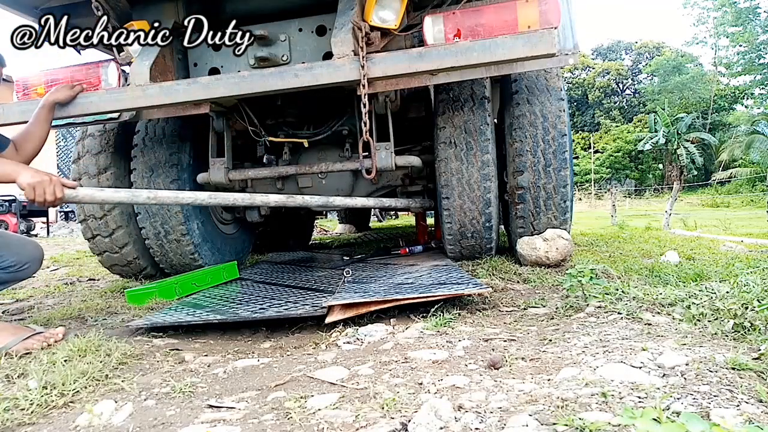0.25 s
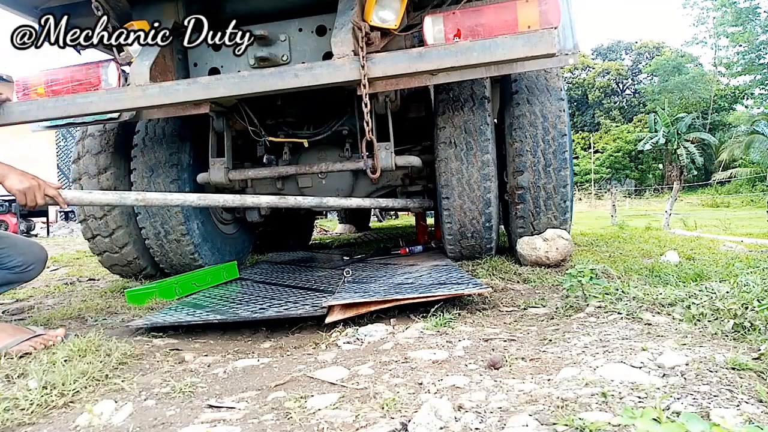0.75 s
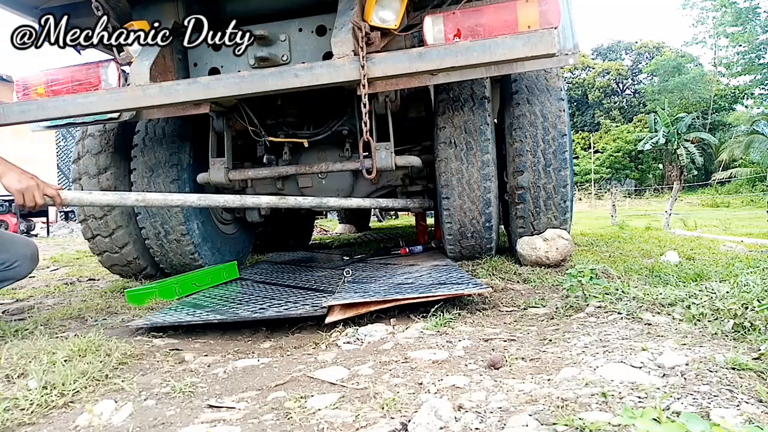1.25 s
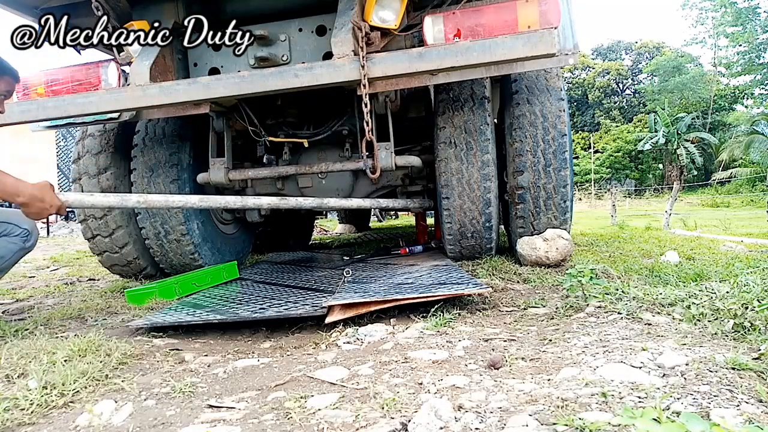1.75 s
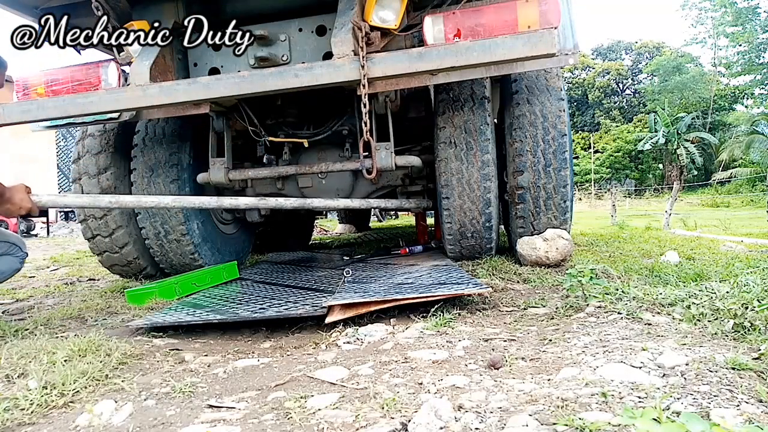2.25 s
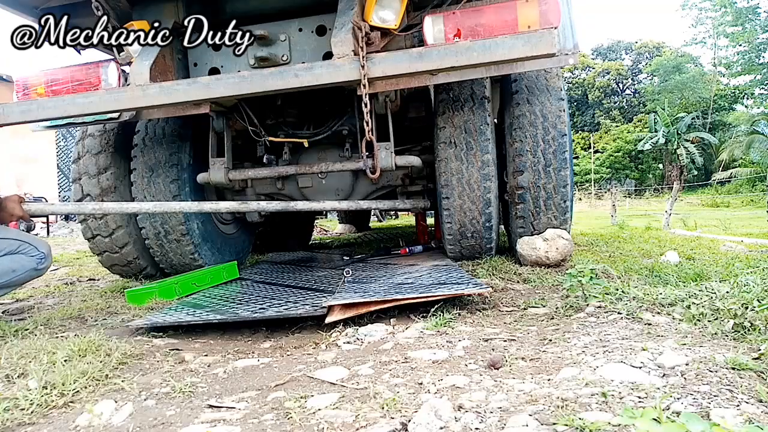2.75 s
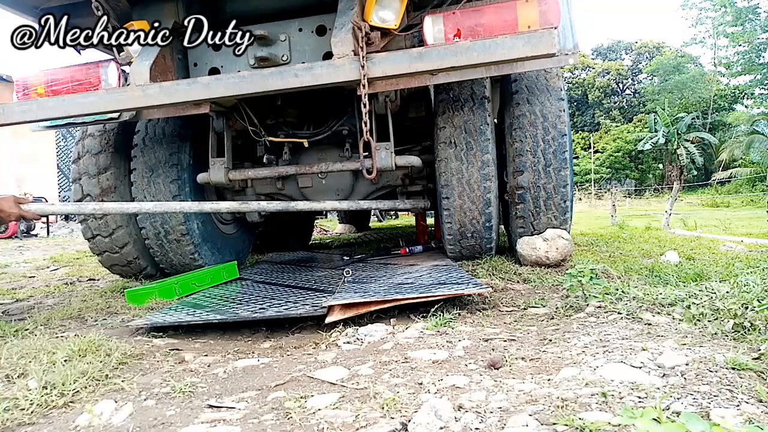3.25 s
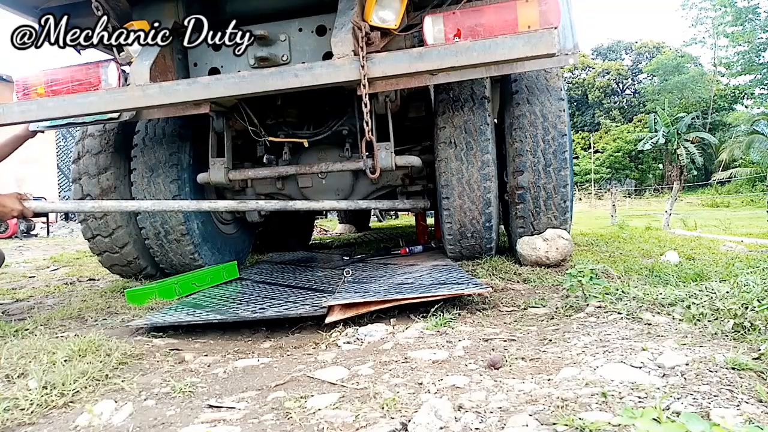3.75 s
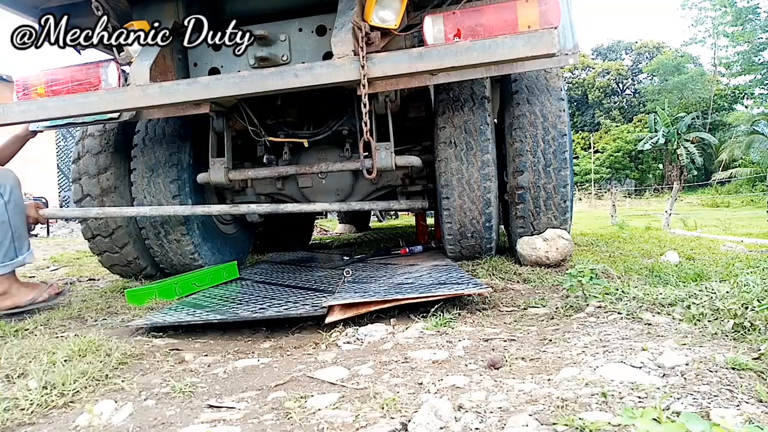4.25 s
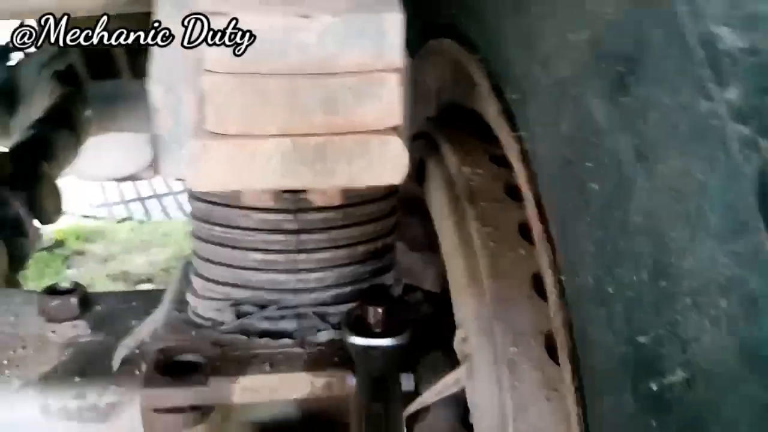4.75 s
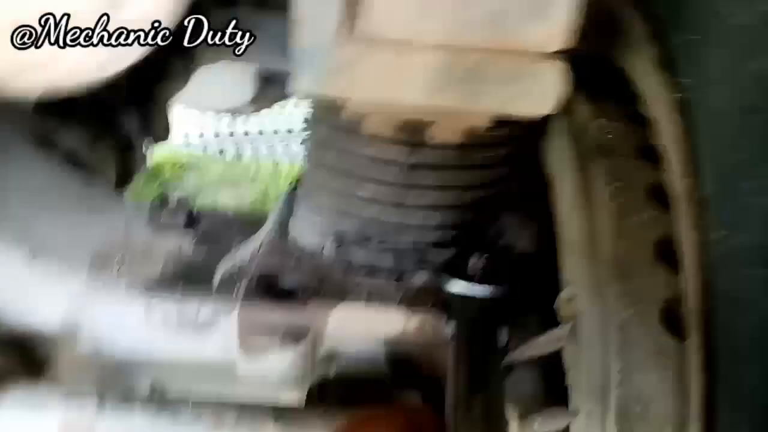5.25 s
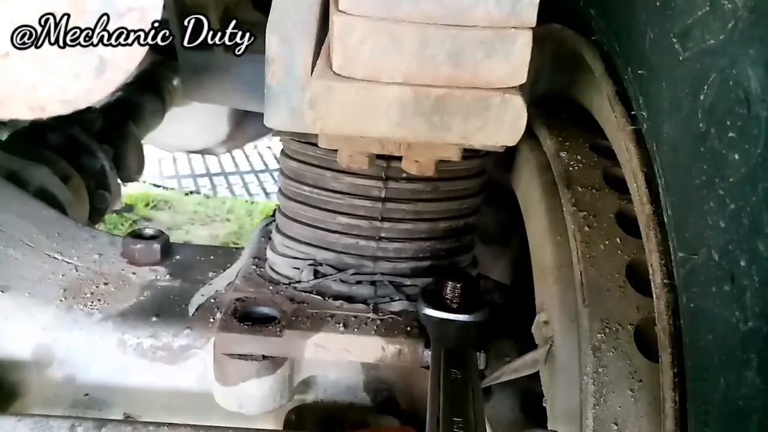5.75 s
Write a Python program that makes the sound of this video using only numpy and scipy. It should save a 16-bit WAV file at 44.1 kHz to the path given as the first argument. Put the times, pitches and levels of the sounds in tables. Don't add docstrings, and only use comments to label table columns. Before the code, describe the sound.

Outdoors in a grassy spot, a continuous high insect trill dominates, with a far engine droning low and running slightly faster from about three seconds. A steel bar clinks lightly a few times. Near 4.7 seconds the phone moves under the truck: insects drop in level, wind thumps buffet each side separately, a sleeve rubs the tyre, and knocks and high clinks follow. Phone stereo, left side duller.

```python
import sys
import numpy as np
from scipy import signal
from scipy.fft import rfft, irfft, next_fast_len
from scipy.io import wavfile
from scipy.ndimage import uniform_filter1d, map_coordinates

SR = 44100
rng = np.random.default_rng(int(sys.argv[2]) if len(sys.argv) > 2 else 0)


def field_ratio(decibels):
    return 10 ** (np.asarray(decibels, dtype=float) / 20)


def wav_record(signal):
    frames = np.transpose(np.atleast_2d(signal))
    bounded = np.clip(frames, -1, 1)
    quanta = np.round(bounded * 32767).astype(np.int16)
    wavfile.write(sys.argv[1], SR, quanta)


N = 264139
TIME = np.arange(N) / SR
CHANGE_S = 4.72


def unit(x):
    return x / np.sqrt(np.mean(x ** 2, axis=-1, keepdims=True) + 1e-20)


def along(points, hz):
    f, v = np.transpose(points)
    return np.interp(np.log(hz + 1), np.log(f + 1), v)


def curves(rows):
    s, *columns = np.transpose(rows)
    return [np.interp(TIME, s, column) for column in columns]


def wobble(rate):
    knots = rng.standard_normal(int(N * rate / SR) + 4)
    return map_coordinates(knots, [TIME * rate])


def bumps(rows):
    return np.sqrt(sum(field_ratio(2 * db) * np.exp(-((TIME - s) / width) ** 2) for s, db, width in rows))


def filtered(x, response):
    m = next_fast_len(N + SR // 4)
    return irfft(rfft(x, m) * response(np.fft.rfftfreq(m, 1 / SR)), m)[..., :N]


def resonance(f, hz, width_hz):
    return 1j * f * width_hz / (hz * hz - f * f + 1j * f * width_hz)


def patchy(x, depth_db):
    z = signal.stft(x, nperseg=512)[2]
    field = uniform_filter1d(rng.standard_normal(z.shape), 4, 1)
    field = uniform_filter1d(field, 12, 2)
    return signal.istft(z * field_ratio(depth_db * field / field.std()), nperseg=512)[1][:, :N]


def ports(common, own, share, lead_s, left_db):
    late = filtered(common, lambda f: np.exp(-2j * np.pi * f * lead_s))
    share = np.clip(share, 0, 1)
    shared = np.sqrt(share) * np.array([common, late])
    return field_ratio([[left_db], [0]]) * (shared + np.sqrt(1 - share) * own)


def changed():
    return np.clip((TIME - CHANGE_S) / 0.064 + 0.5, 0, 1)


def change_dip():
    return -4.5 * np.exp(-((TIME - 4.73) / 0.03) ** 2)


def chorus():
    # time in seconds, level in dB, share heard by both ports from 0 to 1.
    singing = [
        (0, -47.6, 0.7),
        (3, -48.5, 0.84),
        (4.66, -48.5, 0.78),
        (4.86, -51, 0.6),
        (4.95, -53.5, 0.1),
        (5.99, -52.5, 0),
    ]
    # wing resonance in Hz, its width in Hz, level in dB.
    wings = [(3354, 498, -6), (3608, 312, -1.5), (4055, 250, -1.5), (4360, 184, -5.5)]
    level_db, share = curves(singing)
    clicks = (rng.random((3, N)) < 0.25) * rng.standard_normal((3, N))

    def wing_ring(f):
        ring = sum((-1) ** k * field_ratio(db) * resonance(f, hz, width) for k, (hz, width, db) in enumerate(wings))
        return ring * resonance(f, hz=3730, width_hz=960)

    def case_echo(f):
        return [1 - 0.3 * resonance(f, hz=3850, width_hz=250), np.ones_like(f)]

    song = unit(filtered(patchy(clicks, depth_db=1.2), wing_ring))
    both = ports(song[0], song[1:], share, lead_s=0.000745, left_db=-5.0)
    return field_ratio(level_db + change_dip() + 4.5 + 0.12 * wobble(5.4)) * filtered(both, case_echo)


def thumps(rows):
    push_hz, edge_hz, scatter = 118, 296, 0.15
    out, t = np.zeros(N + SR), np.arange(-1024, 1024) / SR
    band = signal.butter(3, [370, 640], "band", fs=SR)
    for s, push_db, edge_db in rows:
        phase, glide, low, high = rng.uniform(-1.14, 1, size=4)
        p_hz, e_hz = push_hz * (1 + scatter * low), edge_hz * (1 + scatter * high)
        push = np.exp(-(t * p_hz / 0.87) ** 2) * np.cos(np.pi * (2 * p_hz * t + phase))
        flutter = np.cos(np.pi * (2 * e_hz * t * (1 + 30 * glide * t) + phase))
        edge = np.exp(-(t * e_hz / 1.7) ** 2) * flutter
        torn_air = unit(signal.lfilter(*band, rng.standard_normal(len(t))))
        rasp = field_ratio(-20) * np.exp(-(t / 0.01) ** 2) * torn_air
        eddy = field_ratio(push_db - 0.4) * push + field_ratio(edge_db - 0.4) * (edge + rasp)
        out[round(s * SR) - 1024:][:len(t)] += eddy
    return out[:N]


def wind():
    # frequency in Hz, turbulence in dB per Hz.
    buffet = [(25, -34), (50, 3), (110, 3.5), (200, 1.5), (300, -10), (450, -24.5), (800, -60), (1500, -57)]
    # middle in seconds, push in dB, edge in dB.
    left_eddies = [(4.801, -31, -36), (4.86, -29.5, -26.5), (4.891, -26.5, -27.5), (4.941, -32.5, -36),
                   (4.978, -29, -38), (4.999, -33, -44), (5.075, -27, -48), (5.126, -30, -32.5),
                   (5.205, -37, -45), (5.288, -37, -52), (5.332, -32, -39), (5.36, -32, -42),
                   (5.405, -40, -48), (5.431, -22.5, -29.5), (5.458, -27, -45), (5.541, -29, -39),
                   (5.626, -29, -22.5), (5.638, -17, -21.5), (5.663, -26, -23.5), (5.692, -28, -21.5),
                   (5.719, -34, -27.5), (5.756, -29, -37), (5.813, -27, -35.5), (5.84, -33, -35),
                   (5.942, -32, -51)]
    # middle in seconds, push in dB, edge in dB.
    right_eddies = [(4.872, -35, -41), (4.927, -37, -49), (4.97, -42, -42), (5.005, -36, -45),
                    (5.073, -27.5, -52), (5.118, -31, -47.5), (5.148, -36, -36), (5.173, -20.5, -31.5),
                    (5.196, -25.5, -30.5), (5.221, -41, -33.5), (5.262, -32, -32.5), (5.284, -22, -30.5),
                    (5.313, -25, -33), (5.374, -33, -53), (5.41, -30, -47), (5.436, -23, -37),
                    (5.488, -22, -20.5), (5.535, -26, -37.5), (5.556, -28, -33), (5.661, -23, -28),
                    (5.683, -24.5, -26), (5.734, -31, -36), (5.759, -17.5, -35), (5.78, -22.5, -43),
                    (5.803, -28, -43), (5.832, -22, -27.5), (5.888, -21, -37), (5.917, -24.5, -35.5),
                    (5.984, -24, -32.5)]
    calm_db, under_eddy_db, linger_s = -49, -12, 0.032
    lumps = field_ratio(2.5 * np.array([wobble(30), wobble(30)]))
    rumble = unit(lumps * filtered(rng.standard_normal((2, N)), lambda f: field_ratio(along(buffet, f))))
    swell = [field_ratio(calm_db) + bumps([(s, db + under_eddy_db, linger_s) for s, db, _ in rows])
             for rows in (left_eddies, right_eddies)]
    onset = np.clip((TIME - 4.76) / 0.013, 0, 1)
    gusts = onset * swell * rumble + [thumps(left_eddies), thumps(right_eddies)]
    return filtered(gusts, lambda f: (1j * f / (1j * f + 55)) ** 2)


def engine():
    # multiple of the firing rate, level at idle in dB.
    idle = [(1, -34), (2, -5), (3, -9), (4, -2), (5, -3), (6, -8), (7, -6), (8, 3), (9, -8), (10, -8),
            (11, -14), (12, -14), (13, -17), (14, -9), (15, -19), (16, -13), (17, -21), (18, -20),
            (19, -19), (20, -22)]
    # multiple of the firing rate, level when running faster in dB.
    faster = [(1, -21), (2, -1), (3, -6), (4, 0), (5, -3), (6, -7), (7, -4), (8, -21), (9, -10), (10, -13),
              (11, -18), (12, -25), (13, -7.5), (14, -8), (15, -7), (16, -51), (17, -25), (18, -28),
              (19, -36), (20, -18)]
    # frequency in Hz, drone in dB per Hz.
    drone_colour = [(25, -26), (40, -31), (50, -8), (75, -7.5), (105, -1), (200, -2.5), (330, -5),
                    (480, -7), (750, -12), (950, -15.5), (1200, -36), (2000, -72)]
    # time in seconds, pitch in Hz, level in dB.
    fan = [
        (0, 1370, -84),
        (2.9, 1400, -84),
        (3.05, 1460, -76),
        (3.3, 1510, -76),
        (4.7, 1500, -78),
    ]
    hz = np.interp(TIME, np.cumsum([2.85, 0.469, 0.392]), [29.35, 31.66, 30.94])
    level_db = -51.5 - 0.47 * TIME + 0.25 * wobble(6.01)
    turn = 2 * np.pi * np.cumsum(hz * (1 + 0.0019 * wobble(7.82))) / SR
    load = np.clip(hz - 29.6, 0, 1)
    tone = np.zeros(N)
    for (k, idle_db), (_, fast_db) in zip(idle, faster):
        gain = field_ratio(idle_db + load * (fast_db - idle_db) + wobble(6.5))
        tone += gain * np.sin(k * turn + rng.uniform(0, 2 * np.pi) + 0.18 * wobble(5))
    throb = 1 + 0.11 * np.cos(turn)
    drone = unit(filtered(throb * rng.standard_normal((3, N)), lambda f: field_ratio(along(drone_colour, f))))
    scatter = filtered(drone[1:], lambda f: f / (f + 700))
    both = ports(field_ratio(0.5) * unit(tone) + drone[0], scatter, share=0.78, lead_s=0.0011, left_db=-4.5)
    whine_hz, whine_db = curves(fan)
    whine_turn = 2 * np.pi * np.cumsum(whine_hz + 6 * wobble(9)) / SR
    whine = field_ratio(whine_db + 2.5 * wobble(7)) * np.sin(whine_turn)
    return (field_ratio(level_db) * both + field_ratio([[0], [-6]]) * whine) * (1 - 0.35 * changed())


def chirps():
    beat_s = [.02, .53, 1.21, 1.68, 2.25, 2.75, 3.3, 3.8, 4.25, 4.71, 5.05, 5.64]
    length_s = 0.085
    swell = np.zeros(N)
    for s, strong in zip(beat_s, rng.standard_normal(len(beat_s))):
        arch = np.cos(np.pi * np.clip((TIME - s) / (1.4 * length_s), -0.5, 0.5))
        swell += field_ratio(-60.5 + 1.3 * strong) * arch
    teeth = (1.2 + 0.2 * np.sin(2 * np.pi * 65 * TIME)) * rng.standard_normal(N)
    scrape = unit(filtered(teeth, lambda f: resonance(f, hz=6550, width_hz=620) ** 2))
    return field_ratio([[-2], [-5]]) * swell * scrape


def clinks():
    # start in seconds, peak in dB, ring in Hz, brightness in dB.
    strikes = [
        (1.261, -63, 1579, 2),
        (1.282, -56, 2030, 13),
        (2.054, -59.5, 1480, -6),
        (4.107, -56, 1830, -20),
        (5.267, -66, 1930, -20),
        (5.477, -52, 983, -20),
        (5.477, -42, 450, -40),
        (5.89, -53, 6370, 6),
        (5.976, -49.5, 5530, 8),
    ]
    out, t = np.zeros((2, N + SR)), np.arange(SR // 10) / SR
    for s, db, hz, bright_db in strikes:
        ring = field_ratio(-3 - 60 * t / 0.05) * np.sin(2 * np.pi * hz * t)
        band = signal.butter(2, [hz / 1.53, hz * 1.28], "band", fs=SR)
        knock = field_ratio(-60 * t / 0.085) * unit(signal.lfilter(*band, rng.standard_normal(len(t))))
        spit = field_ratio(bright_db - 60 * t / 0.018) * np.diff(rng.standard_normal((2, len(t) + 1)))
        out[:, round(s * SR):][:, :len(t)] += field_ratio(db) * (ring + knock + spit)
    return filtered(out[:, :N], lambda f: [field_ratio(-np.clip(f - 7000, 0, 2500) / 70), np.ones_like(f)])


def scuff():
    # middle in seconds, level in dB, half length in seconds.
    brushes = [
        (5.04, -64, 0.032),
        (5.185, -60, 0.018),
        (5.225, -56, 0.012),
        (5.27, -59, 0.018),
        (5.31, -58, 0.022),
        (5.69, -69, .06),
    ]
    grains = field_ratio(3 * wobble(90)) * rng.standard_normal((3, N))
    rub = unit(filtered(grains, lambda f: resonance(f, hz=806, width_hz=620) ** 2))
    both = ports(rub[0], rub[1:], share=0.65, lead_s=0.00029, left_db=-4.0)
    return changed() * field_ratio(4.0) * (field_ratio(-76) + bumps(brushes)) * both


def hums():
    # pitch in Hz, level in dB.
    machine = [(49.5, -81), (112.6, -58.5), (99.4, -63)]
    tones = np.zeros(N)
    for hz, db in machine:
        tones += field_ratio(db + 2.5 * wobble(4)) * np.sin(2 * np.pi * hz * TIME + 0.4 * wobble(4))
    return (1 - changed()) * ports(tones, 0, share=0.97, lead_s=0.0011, left_db=-1.5)


def howl():
    # time in seconds, pitch in Hz, level in dB.
    motor = [(1.7, 515, -95), (1.8, 515, -70), (2.15, 565, -70), (2.28, 550, -71), (2.42, 503, -74),
             (2.6, 495, -75), (2.7, 490, -95), (4.1, 500, -95), (4.2, 510, -72), (4.35, 530, -73),
             (4.45, 535, -95)]
    hz, level_db = curves(motor)
    turn = 2 * np.pi * np.cumsum(hz + 2.5 * wobble(10)) / SR
    tone = field_ratio(level_db + 3 + 1.5 * wobble(8)) * np.sin(turn)
    return ports(tone, 0, share=1, lead_s=0.00045, left_db=2.0)


def air():
    # frequency in Hz, level in dB per Hz.
    air_left = [(1200, -99), (2200, -99), (4600, -90), (5200, -91.5), (6100, -94), (6900, -94),
                (7500, -103), (8000, -111), (8600, -120), (10000, -135)]
    # frequency in Hz, level in dB per Hz.
    air_right = [(1200, -96), (2200, -98), (4700, -88), (6100, -92), (6700, -83.5), (7600, -85),
                 (8400, -89.5), (9300, -96.5), (10800, -94), (11900, -101), (12700, -107), (13700, -107),
                 (14700, -87), (15500, -91.5)]
    # frequency in Hz, gain in dB.
    shelter = [(1200, 3.5), (5000, 0), (7600, -2.5), (8200, -4.5), (8700, 4), (9200, 8), (9600, -1),
               (12000, 0), (13300, 1), (15000, -3)]
    colour = lambda f: field_ratio([along(air_left, f), along(air_right, f)]) * (f > 900)
    hiss = np.sqrt(SR / 2) * filtered(patchy(rng.standard_normal((2, N)), depth_db=1.34), colour)
    sheltered = filtered(hiss, lambda f: field_ratio(along(shelter, f)))
    open_db, under_db = -0.3 * TIME, -2.5
    level_db = open_db + changed() * (under_db - open_db) + 0.45 * change_dip()
    under = np.clip((TIME - CHANGE_S) / 0.39, 0, 1)
    return field_ratio(level_db + 0.75 * wobble(5.6)) * (hiss + under * (sheltered - hiss))


def scene():
    near = chorus() + wind() + engine() + chirps() + clinks() + scuff()
    return near + hums() + howl() + air()


def band_limit(x):
    return signal.sosfilt(signal.butter(12, 16240, fs=SR, output="sos"), x)


def record(dry):
    return band_limit(dry)


dry = scene()
out = record(dry)
wav_record(out)
```